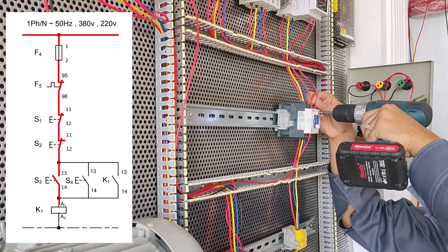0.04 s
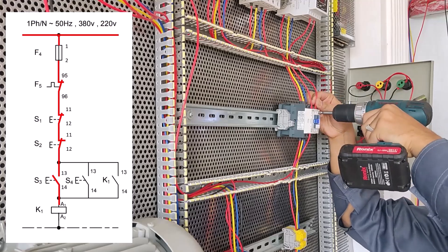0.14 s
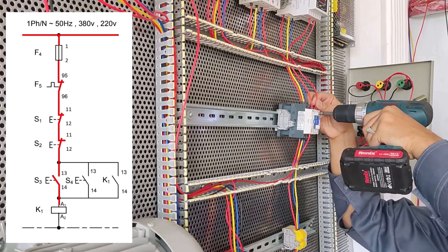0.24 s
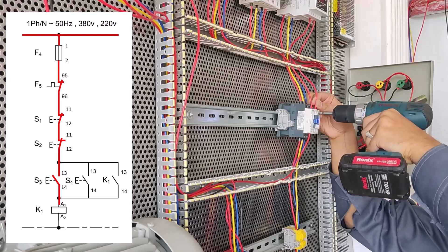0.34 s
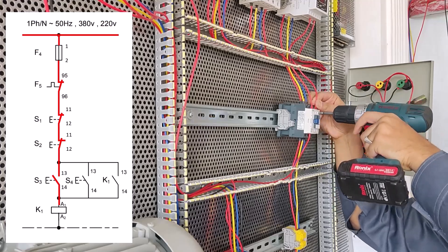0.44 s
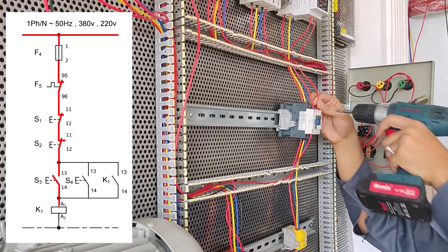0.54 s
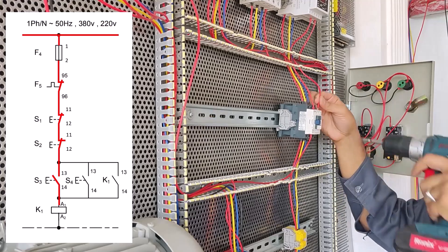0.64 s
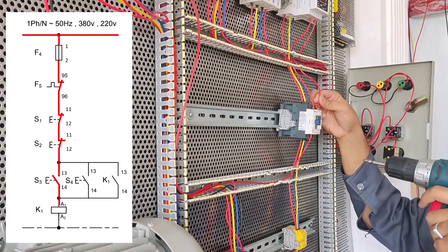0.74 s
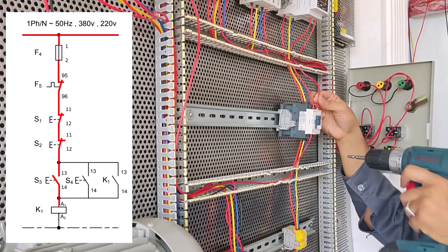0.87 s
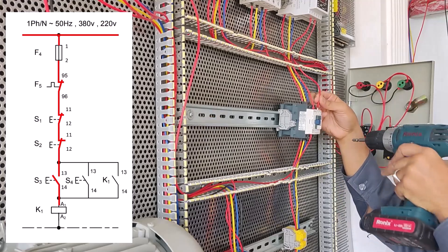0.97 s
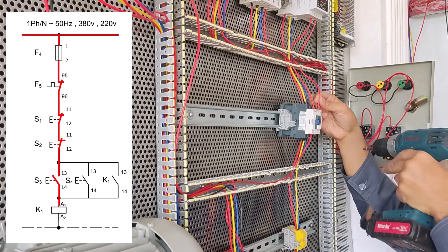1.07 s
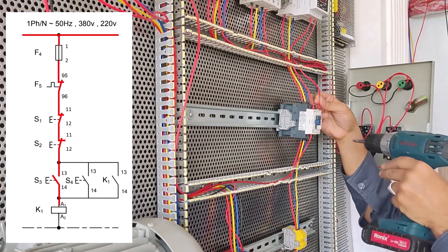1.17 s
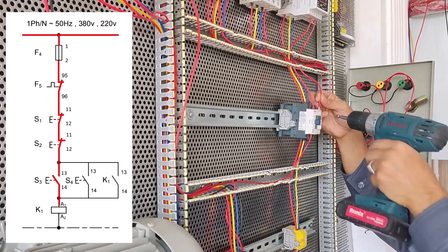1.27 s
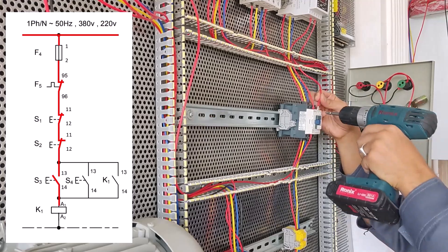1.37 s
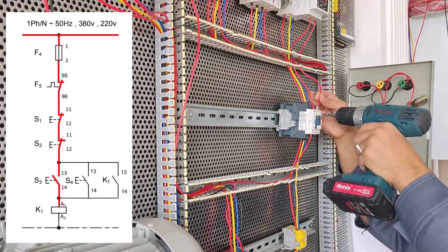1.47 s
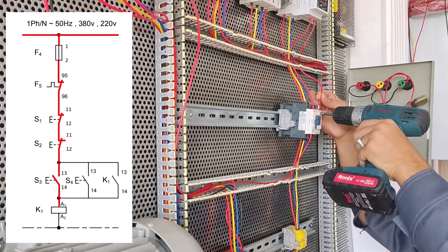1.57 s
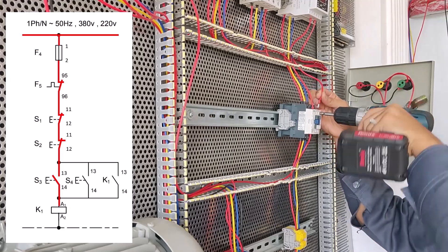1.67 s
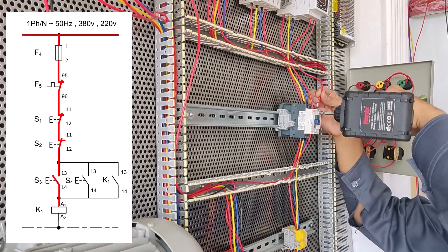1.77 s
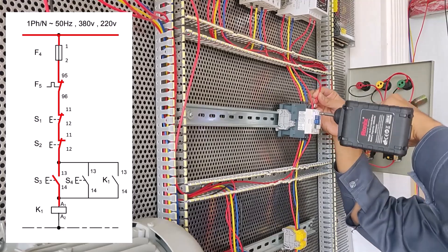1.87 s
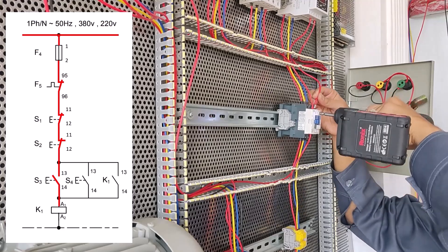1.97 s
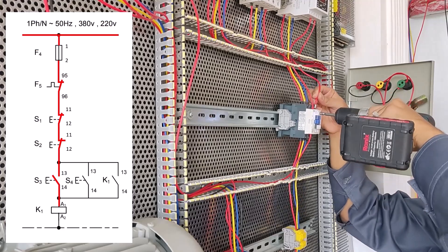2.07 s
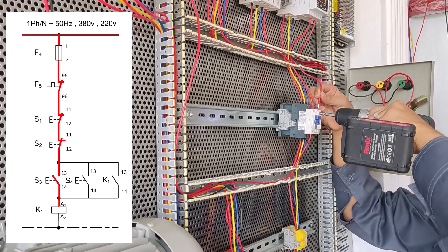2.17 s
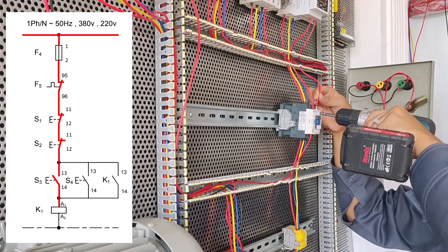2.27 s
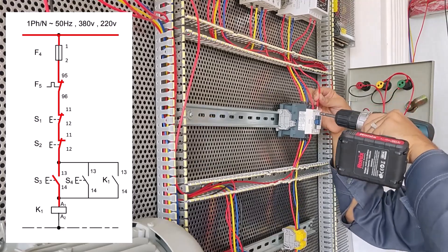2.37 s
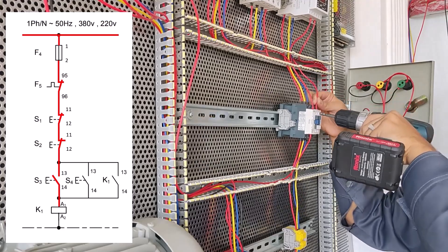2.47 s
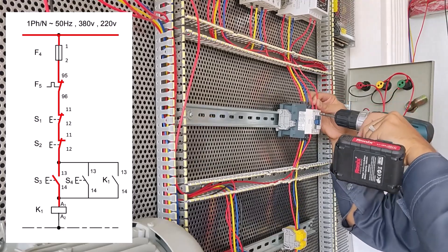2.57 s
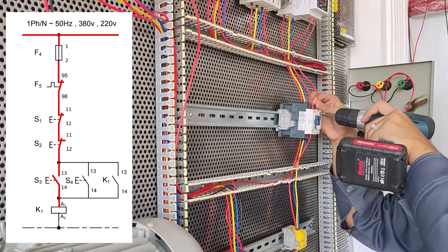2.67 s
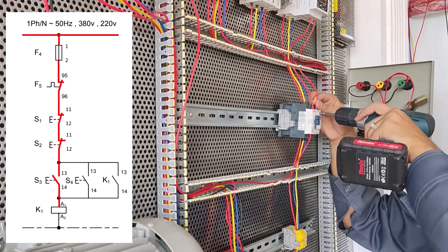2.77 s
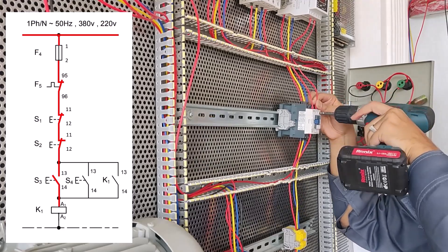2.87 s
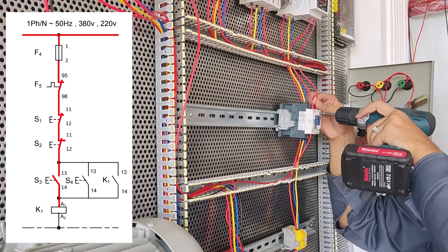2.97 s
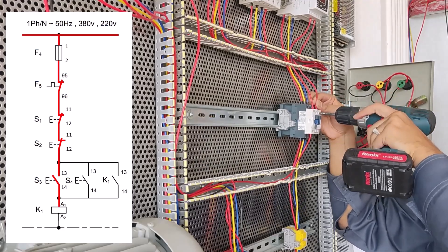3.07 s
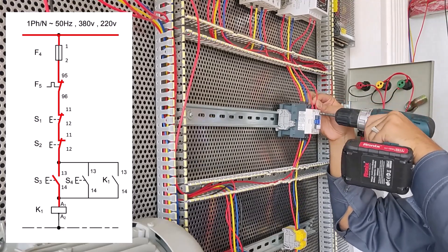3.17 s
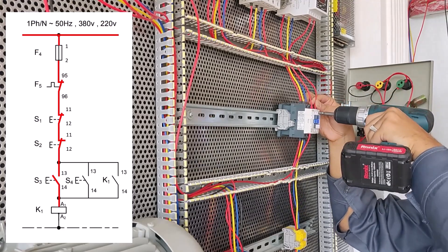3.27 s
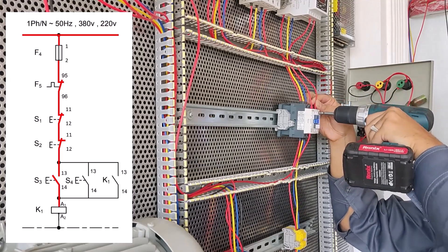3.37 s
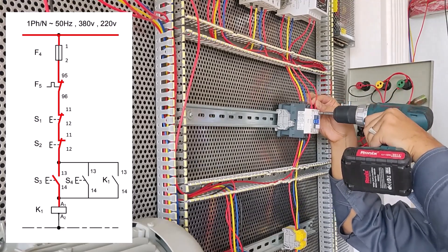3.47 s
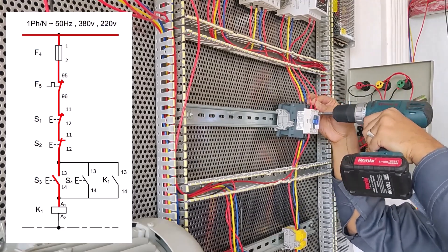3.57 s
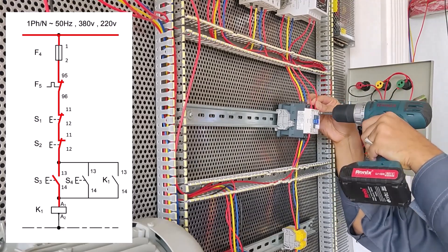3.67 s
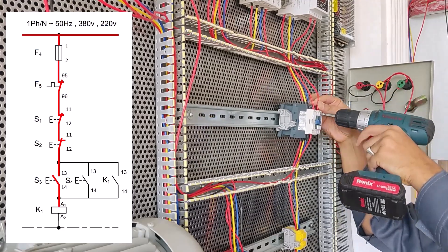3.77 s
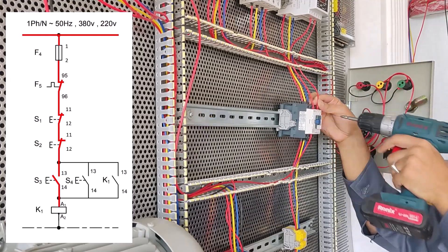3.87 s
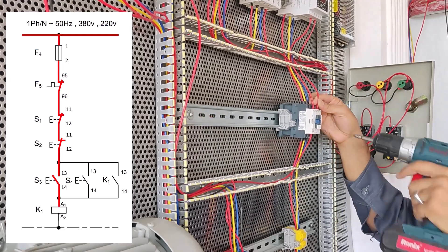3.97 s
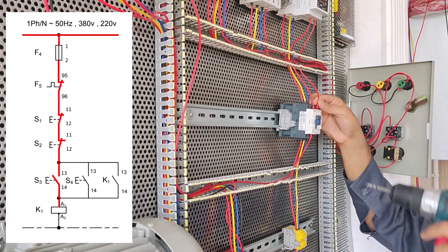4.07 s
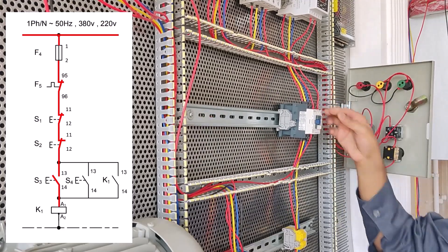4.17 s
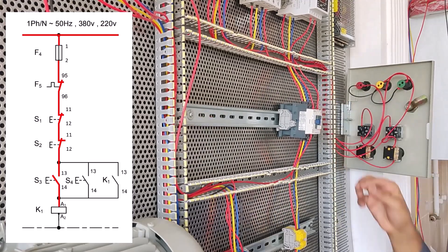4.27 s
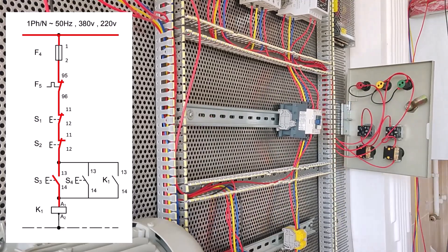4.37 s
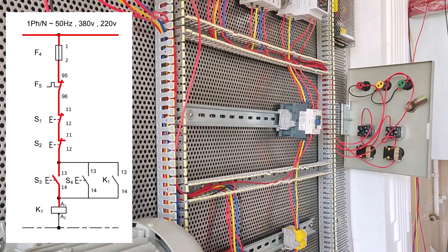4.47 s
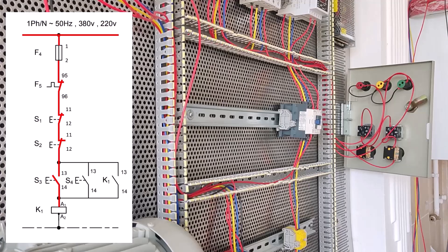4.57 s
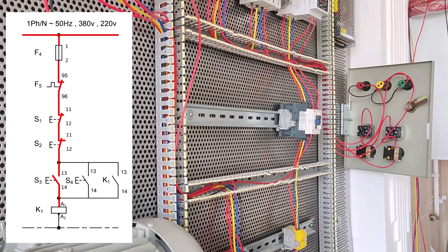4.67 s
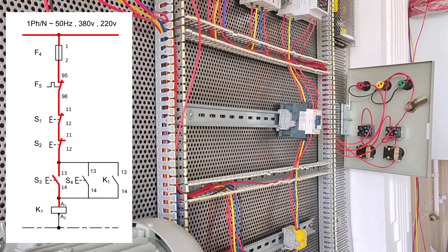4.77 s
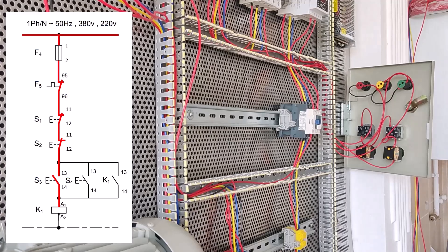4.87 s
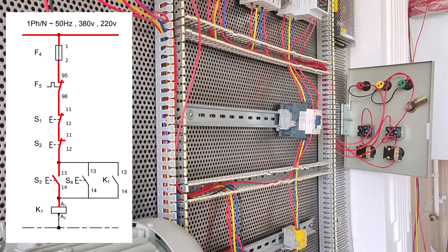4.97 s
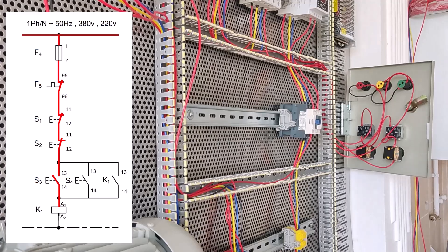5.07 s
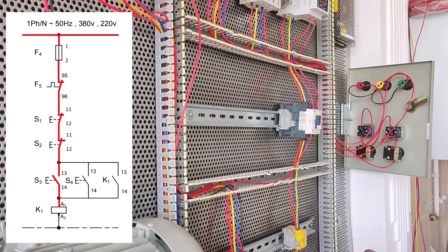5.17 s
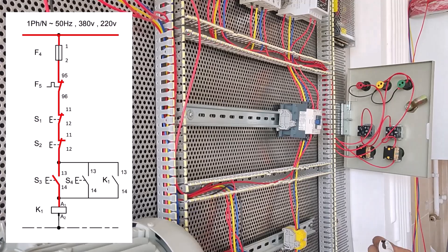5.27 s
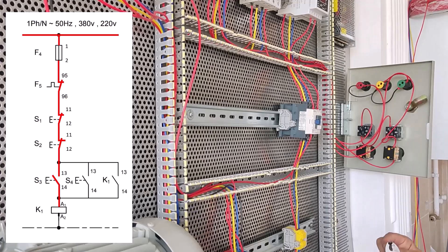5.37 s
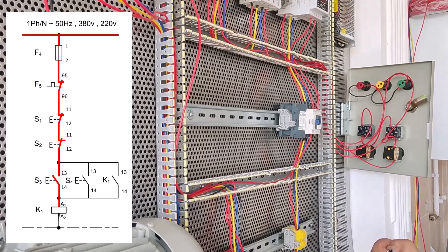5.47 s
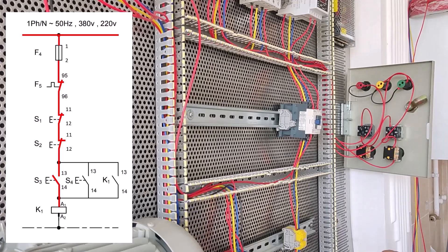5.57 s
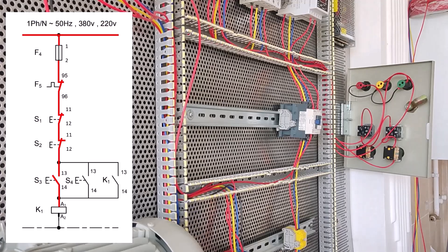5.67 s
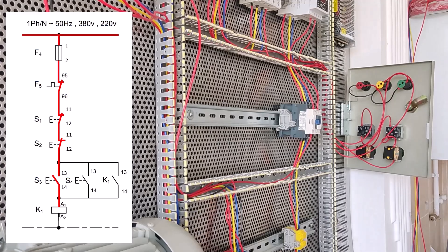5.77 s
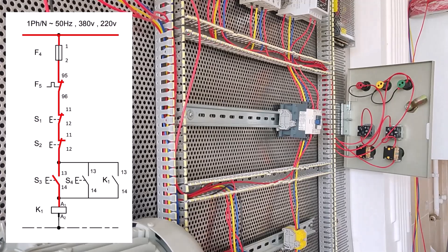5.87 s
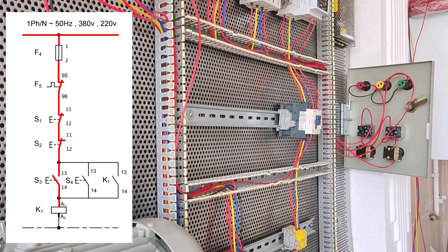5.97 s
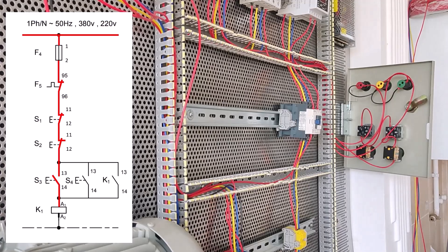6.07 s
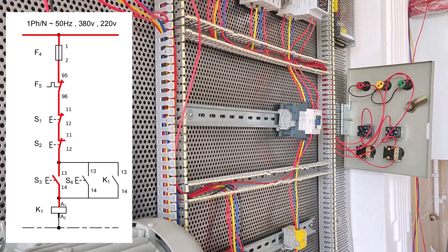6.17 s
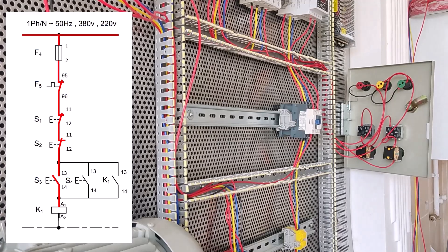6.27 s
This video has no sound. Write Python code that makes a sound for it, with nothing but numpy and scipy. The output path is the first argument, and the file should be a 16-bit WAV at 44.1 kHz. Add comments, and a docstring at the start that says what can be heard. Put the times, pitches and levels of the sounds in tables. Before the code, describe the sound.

Close mono sound in a small, hard room with short reflections and a very quiet low rumble. A cordless drill is already spinning at the start, gritty gears and a thin whine; from 0.23 s its clutch hammers about forty times a second, stopping just after 0.44 s with a short housing jolt. Faint scrapes at 0.65 s, a tiny click at 1.0 and a bright, hard plastic snap at 1.16. The bit ticks the screw at 1.72. A second run, with clearer whine and no clutch, lasts 1.85-2.27 s. A small click at 2.75, a clustered clack around 3.05, a scrape at 3.2, then a third run from 3.23, roughening into clutch rattle at 3.6-3.85. Then near quiet: soft knocks and rubs around 4.5-5.0, a faint low wavering hum from 4.56 onward, a light touch at 5.7, a dull heavy double knock near 5.87, and a last brief scuff at 6.2.

```python
"""A cordless drill is already turning, then its clutch rattles on a tight screw; two more short runs follow,
the last ending in slips again. Whine is tones locked to the shaft, gear rattle is filtered impact noise,
each slip is a burst of impacts ringing the chuck. Between runs the bit scrapes and the plastic case clicks
(noise bursts, struck modes); later come rubs and dull knocks. Small hard room, low rumble, faint hum, mono."""
import sys
import numpy as np
from scipy import signal
from scipy.fft import rfft, irfft
from scipy.io import wavfile
from scipy.ndimage import uniform_filter1d

SR = 44100
rng = np.random.default_rng(int(sys.argv[2]) if len(sys.argv) > 2 else 0)


def int16_out(signal):
    """Quantize to a 16-bit WAV file."""
    q = np.round(np.clip(np.atleast_2d(signal).T, -1, 1) * 32767)
    wavfile.write(sys.argv[1], SR, q.astype(np.int16))


N = 279140
T = np.arange(N) / SR

# Colours are relative spectral densities; levels are those before room and mix gains.
# steady background colours [f/Hz, density/dB per Hz]
AIR_COLOUR = [(180, -12.5), (300, -1), (480, -8), (750, -7.5), (1200, -10.5), (2500, -12.5), (5000, -23),
              (14000, -29.5)]
RUMBLE_COLOUR = [(15, -10.5), (32, 5), (50, -6.5), (75, -13), (130, -27), (300, -69)]
HUM_COLOUR = [(60, -12.5), (100, -5.5), (140, 3.5), (195, -9.5), (250, -5.5), (350, -18), (550, -34.5),
              (1200, -54.5)]
# hum level over time [t/s, level/dB]
HUM_LEVEL = [(0, -64), (1.2, -70), (4.1, -71), (4.49, -75.5), (4.57, -70), (5.05, -64), (5.55, -66),
             (5.75, -60), (6.33, -58)]
# panel sways as the drill is pushed against it or shifted [t/s, rumble level/dB, half length to 1/e/s]
PANEL_SWAYS = [(0.362, -47.5, .11), (2.028, -45, 0.0245), (3.117, -42.5, 0.11), (3.42, -51.5, 0.083),
               (3.741, -35, .045), (5.9, -42, .02)]
RUMBLE_DB, RUMBLE_WANDER_DB, AIR_DB, AIR_WANDER_DB = -57.5, 2.5, -78.5, 1.1
# drone: onset, centre, width at half amplitude, level
DRONE_FROM_S, DRONE_HZ, DRONE_WIDTH_HZ, DRONE_DB = 4.56, 138, 34, -61.5

# room reverberation [f/Hz, t60/s]
ROOM_DECAY = [(100, .2), (1400, .26), (4500, .24), (8000, .16), (15000, .12)]

# rubs of hand, sleeve and wires [t/s, level/dB, rise/s, t60/s, tilt/dB per octave]
RUBS = [(4.42, -64, 0.013, 0.12, 16), (4.772, -40, 0.0089, 0.061, 4.5), (4.823, -42, 0.021, 0.087, 1),
        (4.945, -69.5, 0.0072, .12, 0), (5.712, -51, 0.0083, .1, 8.5), (6.218, -40, 0.0073, 0.11, -1),
        (6.315, -66, .015, 0.15, -0.5)]
# scuffing colour [f/Hz, density/dB per Hz]
RUB_COLOUR = [(240, -39), (450, -9), (650, -8.5), (880, 2), (2100, -1.5), (2900, -0.5), (4450, -6.5),
              (6000, -20), (7500, -12), (11400, -12.5), (14300, -19.5)]
# dull knocks of things put down [t/s, level/dB, rise/s, t60/s, tilt/dB per octave]
KNOCKS = [(4.538, -44, .005, 0.11, 3), (4.765, -40.5, 0.0056, 0.15, 4), (5.02, -48.5, 0.017, 0.17, -7.5),
          (5.79, -60, .03, .2, -3), (5.853, -26.5, 0.0056, 0.18, 0), (5.891, -22, 0.0071, 0.072, 1),
          (5.915, -23, 0.017, 0.095, -1)]
# knock colour [f/Hz, density/dB per Hz]
KNOCK_COLOUR = [(40, -17.5), (100, -7.5), (170, -4.5), (255, -3.5), (330, -4.5), (480, 1.5), (720, -2),
                (1200, -12), (2000, -19.5), (3300, -31.5), (5500, -47.5), (14000, -56)]
# things ringing when touched or put down [t/s, level/dB, f/Hz, width/Hz, t60/s]
THING_RINGS = [(.645, -60.5, 1570, 300, 0.36), (1.722, -46.5, 4730, 650, .22),
               (1.724, -46, 8670, 506, 0.11), (4.532, -39.5, 422, 162, 0.13),
               (4.538, -59.5, 4540, 220, 0.094), (4.757, -35.5, 157, 69.6, 0.14),
               (5.02, -49.5, 676, 260, 0.17), (5.022, -59.5, 1666, 450.3, 0.12), (5.53, -70, 733, 60, .2),
               (5.703, -50.5, 2440, 884, 0.16), (5.704, -59.5, 3900, 450, .12),
               (5.705, -55, 6800, 704, 0.1), (5.889, -24.5, 259, 88, 0.15)]

# bit scraping into the screw head [t/s, level/dB, rise/s, t60/s, tilt/dB per octave]
BIT_SCRAPES = [(.655, -62.5, 0.0083, 0.13, 5), (.70, -63, 0.028, 0.12, 1),
               (1.722, -46.5, 0.007, 0.14, -1.5), (3.21, -53.5, 0.0097, 0.13, -0.5)]
# bit-on-screw colour [f/Hz, density/dB per Hz]
BIT_COLOUR = [(300, -8), (1100, -5), (1550, 5), (2300, -4), (3600, -1.5), (5000, -12), (6000, -14),
              (7200, -9), (9000, -6), (13000, -14), (14400, -20)]

# clicks of plastic case and switch [t/s, level/dB, t60/s, tilt/dB per octave]
CASE_CLICKS = [(1.002, -42.5, 0.024, 4.5), (1.01, -51, 0.14, 8.5), (1.157, -19, 0.015, 1.5),
               (1.163, -38, 0.064, 3), (2.745, -42, 0.029, 0), (3.042, -34.5, 0.029, -1),
               (3.049, -29, 0.038, 4.5), (3.057, -32.5, 0.15, 0), (3.081, -36.5, 0.13, -2.5)]
# case colour [f/Hz, density/dB per Hz]
CASE_COLOUR = [(100, -59), (400, -20.5), (800, -25), (1300, -4.5), (2100, -6.5), (3200, 0.5), (4300, -5),
               (5200, -5.5), (6200, -17), (7700, -2), (10000, -9.5), (14400, -15.5)]
# case resonances [f/Hz, width/Hz, level over the broad sound/dB]
CASE_MODES = [(1500, 115, 2.5), (2770, 240, 6), (3580, 89, 8.5), (4180, 104.6, 7.5), (7290, 220, -4.5)]
# lingering case rings [t/s, level/dB, f/Hz, width/Hz, t60/s]
CASE_RINGS = [(1.012, -54, 3670, 1630, 0.19), (1.157, -44, 4150, 420, 0.14), (1.156, -36, 2800, 800, 0.06),
              (1.156, -41, 1450, 500, 0.05), (2.748, -44, 3000, 845, 0.2), (3.052, -41, 3340, 1400, 0.5),
              (3.2, -52, 1810, 450, 0.23)]
# sharp modes struck by every click [f/Hz, relative level/dB, t60 before hand damping/s]
SNAP_MODES = [(1620, -17, 0.21), (2562, 0, 0.055), (2891, -3, 0.087), (3515, -9, 0.11), (4048, -5, 0.11),
              (5265, -10, 0.082), (7241, -5, 0.057), (7725, -14, 0.11), (9308, -12, 0.11),
              (9701, -16, 0.18)]
# ring level against the snap; the hand damps any longer t60
SNAP_RING_DB, SNAP_LONGEST_S = -15, .08

# housing jolt at motor start [delay after pull/s, level/dB, f/Hz, width/Hz, t60/s]
START_JOLT = [(.024, -41, 545, 260, .28), (.027, -34.5, 4620, 560, .26)]
# housing jolt at braking [delay after release/s, level/dB, f/Hz, width/Hz, t60/s]
BRAKE_JOLT = [(.008, -31.5, 711, 180, .18), (.008, -38.5, 2160, 600, .22)]

# clutch slipping on a tight screw [first slip t/s, trigger release t/s, slip period/s]
RATCHETS = [(.2277, 0.439, .0235), (3.598, 3.782, .0268)]
# slip strength as the hand bears down and eases, before unevenness and run-down [t/s, level/dB]
SLIP_FORCE = [(.228, -27.5), (.255, -23), (.32, -23), (.385, -20.5), (.416, -31), (.44, -23),
              (3.598, -21.5), (3.625, -27.5), (3.66, -23), (3.79, -24.5)]
# clutch colour [f/Hz, density/dB per Hz]
CLUTCH_COLOUR = [(25, -4), (70, -7), (150, -7.5), (400, -1), (800, -1), (1400, 1), (2200, -3.5), (4000, -6),
                 (5100, -4), (5900, -23.5), (7500, -17.5), (9000, -9.5), (12000, -18), (14400, -21)]
# steel chuck and bit resonances [f/Hz, width/Hz, level over the broad sound/dB]
CHUCK_MODES = [(620, 85, 1), (1215.6, 56.7, 2), (1470, 75, 2.5), (2980, 87, 3.5), (3570, 120, 1),
               (4570, 140, 10.5), (4830, 190, 8), (8775, 570, 12.5), (11200, 200, 8)]
# every other slip is softer; all weaken ever faster after release
UNEVEN_DB, RUN_DOWN_S, RUN_DOWN_DB = 0.5, .095, 23
SLIP_RISE_S, SLIP_T60_S = 0.0008, .095
# tilt is 0 at BRIGHT_DB, duller below, brighter above
BRIGHT_DB, TILT_DB_PER_OCTAVE_PER_DB = -22.5, 0.17

# trigger pulls [pull t/s, release t/s, free shaft f/Hz, gear rattle level/dB, whine level/dB,
#                side-load tone level/dB, gear rattle growth/dB per s]
RUNS = [(-.14, .44, 309, -34.5, -51, -51.5, 6.5), (1.849, 2.27, 300, -33, -43, -67, -5.5),
        (3.228, 3.777, 309.5, -35.5, -53, -48, 9.5)]
# commutator whine [multiple of shaft rate, level/dB]
WHINE_ORDERS = [(3, -6.5), (9, -4), (12, -0.5), (15, -8.5), (18, -18.5), (24, -10.5), (30, -7)]
# shaft and pinion tones, drill pressed at an angle [multiple of shaft rate, level/dB]
PINION_ORDERS = [(1, -14), (2, -11.5), (3, 0), (7, -10), (10, 0), (25, -10.5), (28, -6)]
# gearbox colour [f/Hz, density/dB per Hz]
GEARBOX_COLOUR = [(150, -30.5), (300, -20.5), (410, -22), (600, -1), (790, -12.5), (1100, -3.5), (1550, 0),
                  (2400, -2.5), (3700, -1), (5000, -9.5), (6200, -10.5), (7500, -0.5), (11800, -3.5),
                  (14400, -12)]
# gearbox housing resonances [f/Hz, width/Hz, level over the broad sound/dB]
HOUSING_MODES = [(3750, 62, -3), (4530, 150, -0.5), (7614, 450, -8.5)]
# exponential spin-up, linear braking; slipping clutch takes a share of speed
SPIN_UP_S, BRAKE_S, CLUTCH_DRAG, DRAG_S = .026, .1, .11, .022
# gear rattle: fast swell up to BITE_S after the pull, fade from FADE_DELAY_S after release
BITE_S, FADE_DELAY_S, SWELL_DB_PER_S, FADE_DB_PER_S = 0.031, .008, 999.5, 900

TOP_HZ = 14400


def undb(db):
    """Decibels to amplitude gain."""
    return np.exp(np.asarray(db) * (np.log(10) / 20))


def unit(x):
    """Scale to rms 1."""
    return x / np.sqrt(np.mean(x ** 2))


def decay(t_s, t60_s):
    """Exponential fade, -60 dB at t60."""
    return np.exp(-np.log(1000) * t_s / t60_s)


def walk(rate_hz):
    """Smoothed random steps, rms 1."""
    k = int(SR / rate_hz)
    steps = np.repeat(rng.standard_normal(N // k + 1), k)
    return unit(uniform_filter1d(steps, k)[:N])


def response(colour, modes=(), tilt_db=0, size=4096):
    """Minimum-phase impulse response of a body: broad colour plus resonances, unit energy."""
    f = np.maximum(np.arange(size // 2 + 1) * SR / size, 1)
    hz, db = np.transpose(colour)
    tilt = tilt_db * np.log2(np.clip(f, hz[0], hz[-1]))
    gain = undb(np.interp(np.log(f), np.log(hz), db) + tilt)
    peaks = sum(undb(2 * d) / (1 + (2 * (f - c) / w) ** 2) for c, w, d in modes)
    # fold the cepstrum to make the response causal
    cepstrum = irfft(np.log(gain * np.sqrt(1 + peaks)))
    cepstrum[1:size // 2] *= 2
    cepstrum[size // 2 + 1:] = 0
    h = irfft(np.exp(rfft(cepstrum)))
    return h / np.sqrt(np.sum(h ** 2))


def through(x, h):
    """Convolve with an impulse response, keeping the length."""
    return signal.oaconvolve(x, h)[:len(x)]


def grit(count, spread_db):
    """Dense tiny impacts of uneven size, rms 1."""
    sizes = undb(spread_db * rng.standard_normal(count))
    return unit(rng.standard_normal(count) * sizes)


def add(out, t_s, x):
    """Mix x into out from t_s."""
    i = int(t_s * SR)
    out[i:i + len(x)] += x[:N - i]


def contacts(rows, colour, modes=(), spread_db=4):
    """Each contact is a cloud of tiny impacts that swells, fades and rings a body."""
    out, lead_s = np.zeros(N), .12
    t = np.arange(SR // 2) / SR - lead_s
    for s, db, rise_s, t60_s, tilt_db in rows:
        force = np.exp(np.where(t < 0, t / rise_s, -np.log(1000) * t / t60_s))
        # grip and contact point shift the resonances a little each time
        shifted = [(hz * (1 + 0.005 * rng.standard_normal()), width, gain_db) for hz, width, gain_db in modes]
        impacts = force * grit(len(t), spread_db)
        add(out, s - lead_s, undb(db) * through(impacts, response(colour, shifted, tilt_db)))
    return out


def rings(rows):
    """A dense cluster of close modes, as band noise, struck and left to fade."""
    out, t = np.zeros(N), np.arange(SR // 2) / SR
    f = np.arange(len(t) // 2 + 1) * SR / len(t)
    onset = np.minimum(t / 0.0026, 1)
    for s, db, hz, width_hz, t60_s in rows:
        band = 1 / (1 + (2 * (f - hz) / width_hz) ** 4)
        cluster = unit(irfft(rfft(rng.standard_normal(len(t))) * band, len(t)))
        add(out, s, undb(db) * cluster * onset * decay(t, t60_s))
    return out


def tones(orders, angle):
    """Lines locked to the shaft angle, each wavering in level."""
    total = np.zeros(N)
    for k, db in orders:
        phase = 2 * np.pi * rng.random()
        total += undb(db + 2 * walk(35)) * np.sqrt(2) * np.sin(round(k) * angle + phase)
    return total


def room(x):
    """Diffuse reflections: noise bands, each with its own decay, treble dying first."""
    t = np.arange(SR // 2) / SR
    f = np.maximum(np.arange(len(t) // 2 + 1) * SR / len(t), 1)
    hz, t60s = np.transpose(ROOM_DECAY)
    noise = rfft(rng.standard_normal(len(t)))
    tail = np.zeros(len(t))
    for pick, t60_s in zip(np.eye(len(hz)), t60s):
        share = np.interp(np.log(f), np.log(hz), pick)
        tail += irfft(noise * share, len(t)) * decay(t, t60_s)
    tail = tail * np.clip(t / 0.0026 - 1, 0, 1)
    return through(x, tail / np.sqrt(np.sum(tail ** 2)))


def background():
    """Filtered noises: rumble and hum that swell when the panel sways, and very faint air."""
    rumble, hum, air = (unit(through(rng.standard_normal(N), response(c, size=16384)))
                        for c in (RUMBLE_COLOUR, HUM_COLOUR, AIR_COLOUR))
    sway = sum(undb(db) * np.exp(-((T - s) / half_s) ** 2) for s, db, half_s in PANEL_SWAYS)
    rumble_gain = np.hypot(undb(RUMBLE_DB + RUMBLE_WANDER_DB * walk(3.7)), sway)
    hum_gain = np.hypot(undb(np.interp(T, *np.transpose(HUM_LEVEL))), undb(-21) * sway)
    air_gain = undb(AIR_DB + AIR_WANDER_DB * walk(5.0))
    return rumble * rumble_gain + hum * hum_gain + air * air_gain


def drone():
    """Narrow noise band: a low, wavering tone that sets in and stays to the end."""
    f = np.arange(N // 2 + 1) * SR / N
    band = 1 / (1 + (2 * (f - DRONE_HZ) / DRONE_WIDTH_HZ) ** 2)
    tone = unit(irfft(rfft(rng.standard_normal(N)) * band, N))
    return tone * undb(DRONE_DB) * np.clip((T - DRONE_FROM_S) / .03, 0, 1)


def handling_noises():
    """Rubs and knocks as impact clouds, plus the rings of things touched or put down."""
    rubs = contacts(RUBS, RUB_COLOUR, spread_db=4.5)
    knocks = contacts(KNOCKS, KNOCK_COLOUR, spread_db=2)
    return rubs + knocks + rings(THING_RINGS)


def bit_scrapes():
    """The bit grates into the screw head: impact clouds coloured by bit and screw."""
    return contacts(BIT_SCRAPES, BIT_COLOUR)


def case_clicks():
    """Hard plastic snaps strike a few sharp modes; broader rings linger."""
    snap_rows = [(s, db, .0006, t60_s, tilt) for s, db, t60_s, tilt in CASE_CLICKS]
    clicks = contacts(snap_rows, CASE_COLOUR, CASE_MODES, spread_db=1.5)
    t = np.arange(SR // 4) / SR
    strength = np.sqrt(sum(undb(2 * db) for _, db, _ in SNAP_MODES) / 2)
    for s, db, *_ in CASE_CLICKS:
        ring = np.zeros(len(t))
        for hz, mode_db, t60_s in SNAP_MODES:
            wave = np.sin(2 * np.pi * (hz * t + rng.random()))
            ring += undb(mode_db) * wave * decay(t, min(t60_s, SNAP_LONGEST_S))
        add(clicks, s, undb(db + SNAP_RING_DB) * ring / strength)
    return clicks + rings(CASE_RINGS)


def jolts():
    """The housing rings at each motor start after t = 0 and at each stop."""
    starts = [(pull + delay, *ring) for pull, *_ in RUNS if pull > 0 for delay, *ring in START_JOLT]
    stops = [(release + delay, *ring) for _, release, *_ in RUNS for delay, *ring in BRAKE_JOLT]
    return rings(starts + stops)


def clutch():
    """Evenly spaced slips on the tight screw hammer the chuck; weak slips are duller."""
    slips = []
    for first, release, period in RATCHETS:
        for k, s in enumerate(np.arange(first, release + RUN_DOWN_S, period)):
            spent = max(s - release, 0) / RUN_DOWN_S
            force_db = np.interp(s, *np.transpose(SLIP_FORCE))
            db = force_db - UNEVEN_DB * (k % 2) - RUN_DOWN_DB * spent ** 1.42
            tilt_db = TILT_DB_PER_OCTAVE_PER_DB * (db - BRIGHT_DB)
            slips.append((s, db, SLIP_RISE_S, SLIP_T60_S, tilt_db))
    return contacts(slips, CLUTCH_COLOUR, CHUCK_MODES, spread_db=2.3)


def drive(pull, release):
    """Motor speed as a share of free speed: spin-up, clutch drag, braking."""
    spin_up = 1 - np.exp(-np.maximum(T - pull, 0) / SPIN_UP_S)
    share = spin_up * np.clip(1 - (T - release) / BRAKE_S, 0, 1)
    for tight, *_ in RATCHETS:
        if pull < tight < release:
            share = share * (1 - CLUTCH_DRAG * (1 - np.exp(-np.maximum(T - tight, 0) / DRAG_S)))
    return share


def motor():
    """Whine on multiples of the shaft rate; gear teeth rattle as noise surging three times a turn."""
    shaft_hz, gear_gain, whine_gain, side_gain = np.zeros((4, N))
    for pull, release, free_hz, gear_db, whine_db, side_db, growth in RUNS:
        share = drive(pull, release)
        shaft_hz += free_hz * share
        swell_db = SWELL_DB_PER_S * np.minimum(T - pull - BITE_S, 0)
        fade_db = FADE_DB_PER_S * np.maximum(T - release - FADE_DELAY_S, 0)
        growth_db = growth * (np.clip(T, pull, release) - pull)
        gear_gain += undb(gear_db + growth_db + swell_db - fade_db)
        near_full = share ** 14  # whine sings out only near full speed
        whine_gain += near_full * undb(whine_db)
        side_gain += near_full * undb(side_db)
    angle = 2 * np.pi * np.cumsum(shaft_hz * (1 + 0.00053 * walk(40))) / SR
    whine = tones(WHINE_ORDERS, angle) * whine_gain + tones(PINION_ORDERS, angle) * side_gain
    mesh = 1 + 0.19 * np.cos(3 * angle)
    teeth = unit(grit(N, 3.2) * mesh * undb(1.6 * walk(150)))
    gears = through(teeth, response(GEARBOX_COLOUR, HOUSING_MODES)) * gear_gain
    return gears, whine


def scene():
    """Mix drill, handling and background; drill, clicks and handling feed the room."""
    gears, whine = motor()
    drill = gears + clutch()
    clicks = case_clicks() + bit_scrapes()
    handling = handling_noises()
    reflections = room(undb(-6.5) * drill + undb(-9.5) * clicks + undb(-44) * handling)
    direct = undb(1.5) * drill + jolts() + whine + clicks + handling
    return (direct + reflections + background() + drone())[None]


def suppress(x, threshold_db, depth_db, size=1024):
    """Noise suppressor: turns down bands whose power nears or falls below a threshold, mainly treble."""
    f, _, bins = signal.stft(x, SR, nperseg=size)
    power = uniform_filter1d(np.abs(bins) ** 2 * size, size=15, axis=-2)  # smoothed across frequency
    weight = np.clip(f[:, None] / 2000 - .25, 1e-3, 1)  # full from 2500 Hz, almost none below 500 Hz
    threshold = undb(2 * threshold_db) * weight
    gain = np.maximum(power / (power + threshold), undb(depth_db))
    return signal.istft(bins * gain, SR, nperseg=size)[1][..., :N]


def record(dry):
    """Suppress faint hiss, then cut steeply above TOP_HZ."""
    clean = suppress(dry, threshold_db=-64.0, depth_db=-8.5)
    return signal.sosfilt(signal.ellip(8, .2, 70, TOP_HZ, fs=SR, output="sos"), clean)


dry = scene()
out = record(dry)
int16_out(out)
```